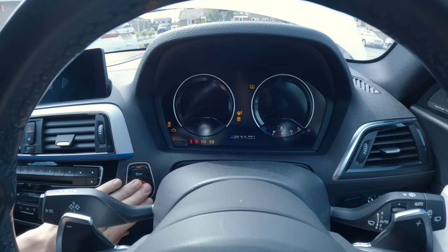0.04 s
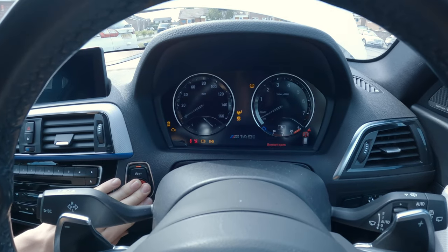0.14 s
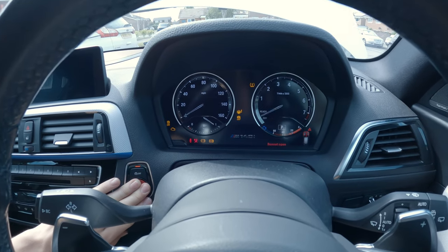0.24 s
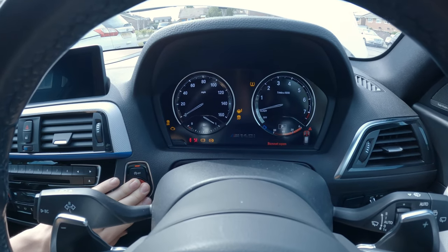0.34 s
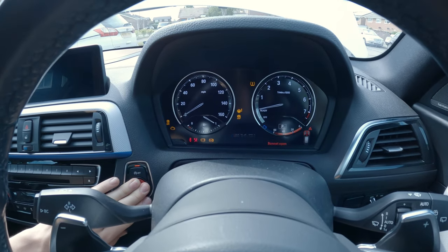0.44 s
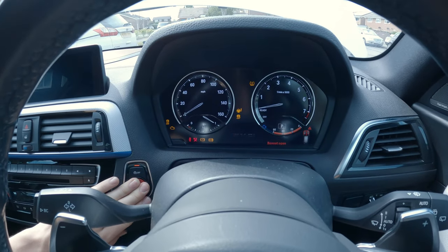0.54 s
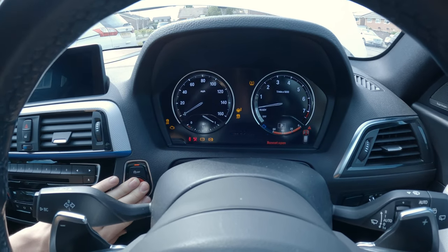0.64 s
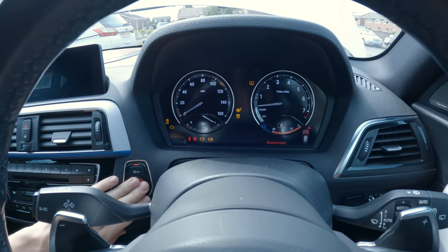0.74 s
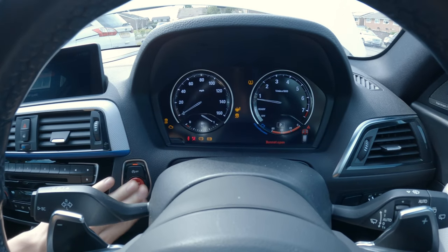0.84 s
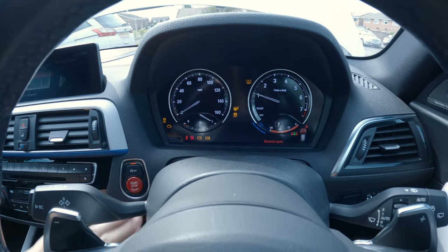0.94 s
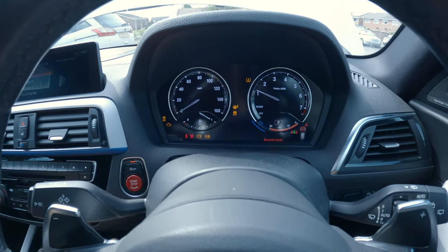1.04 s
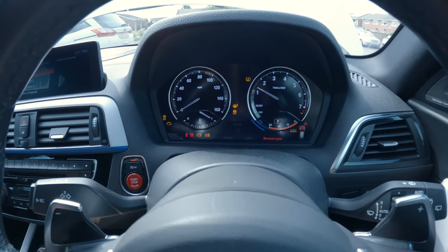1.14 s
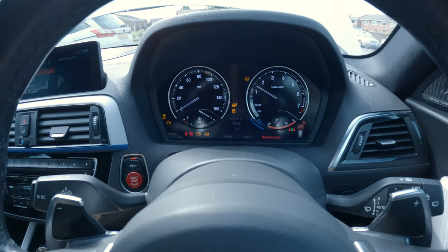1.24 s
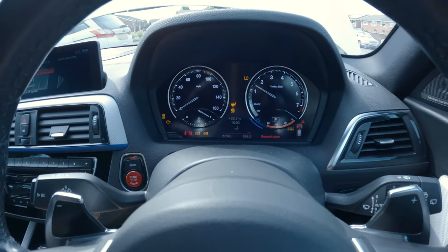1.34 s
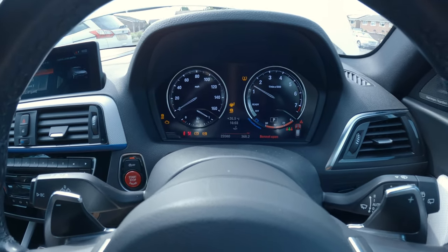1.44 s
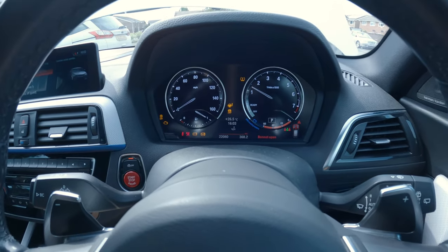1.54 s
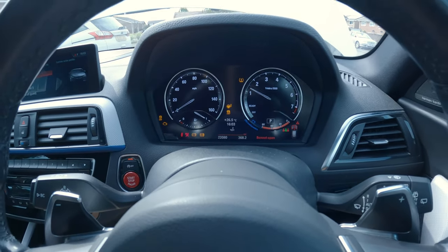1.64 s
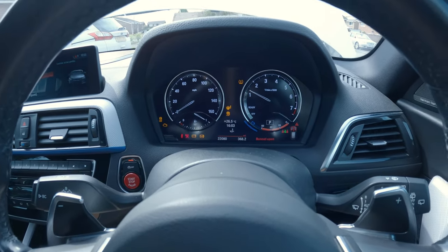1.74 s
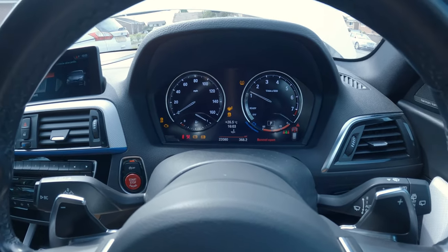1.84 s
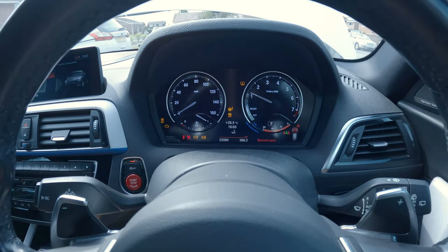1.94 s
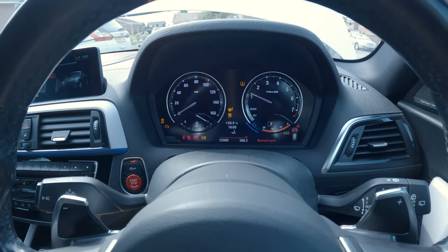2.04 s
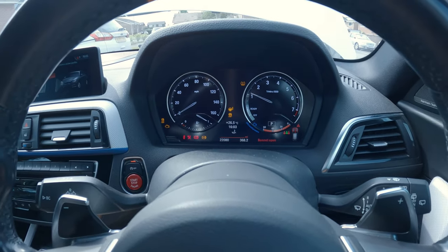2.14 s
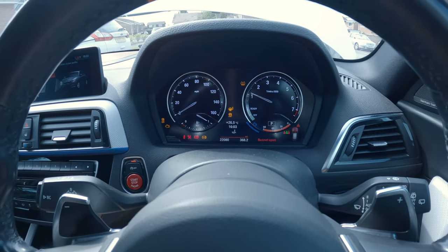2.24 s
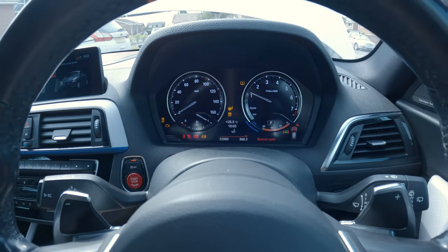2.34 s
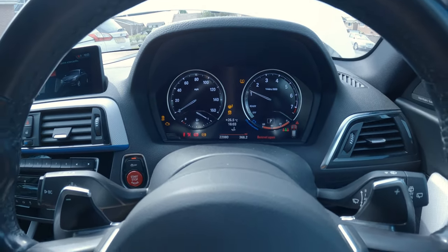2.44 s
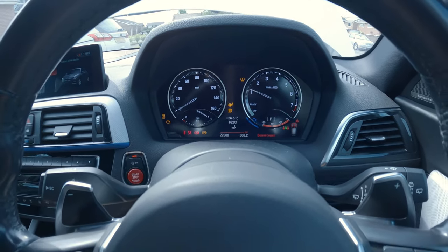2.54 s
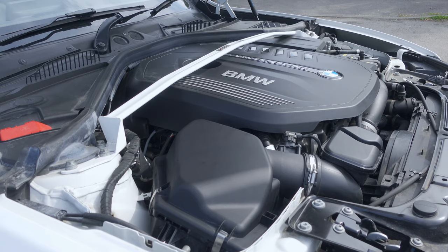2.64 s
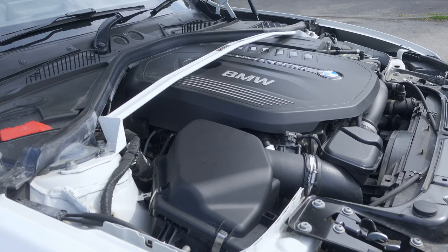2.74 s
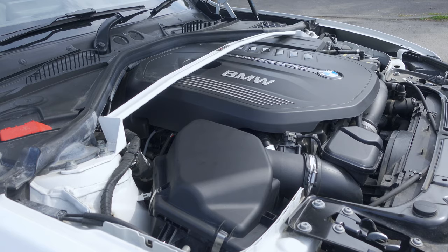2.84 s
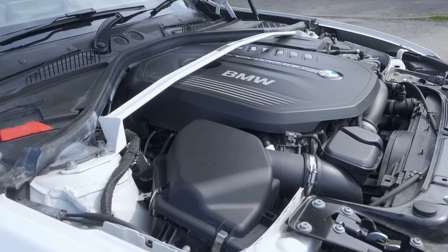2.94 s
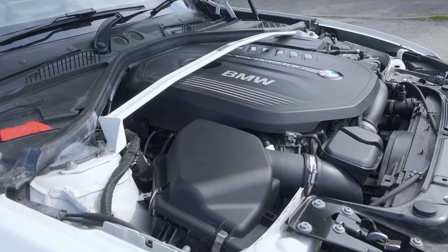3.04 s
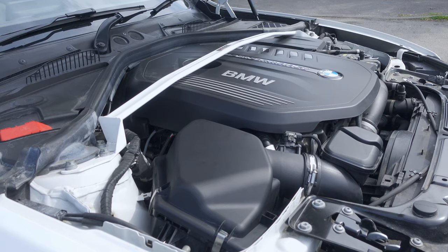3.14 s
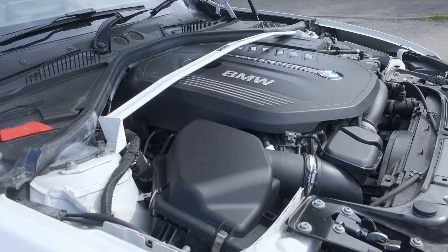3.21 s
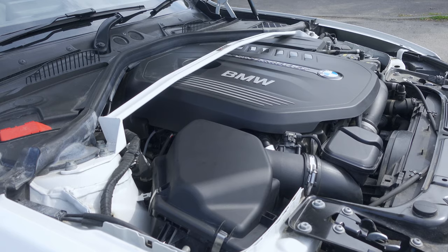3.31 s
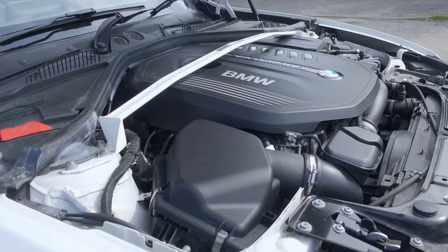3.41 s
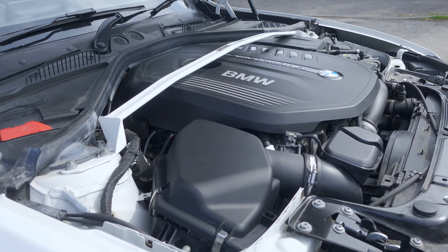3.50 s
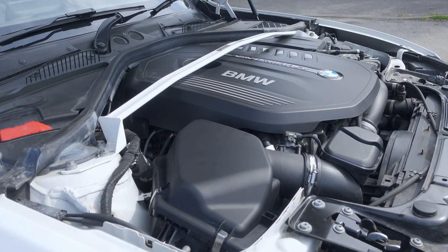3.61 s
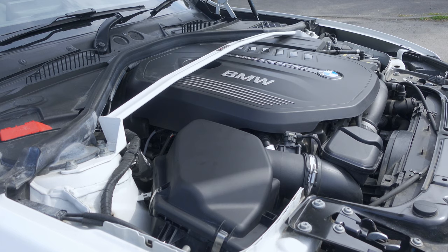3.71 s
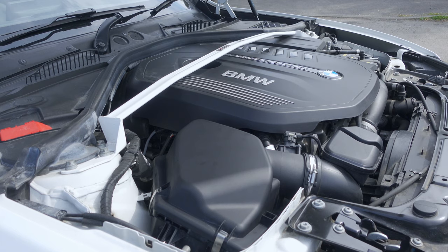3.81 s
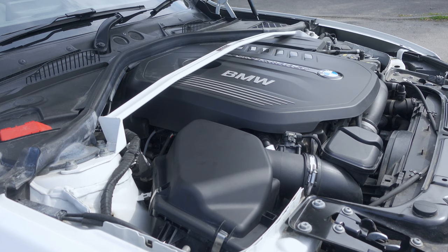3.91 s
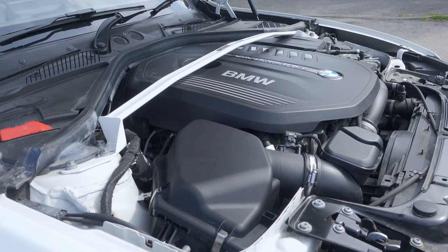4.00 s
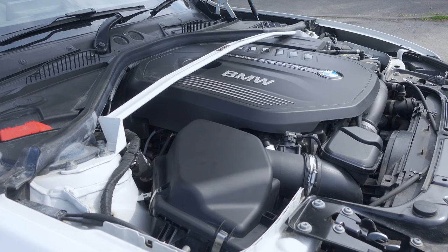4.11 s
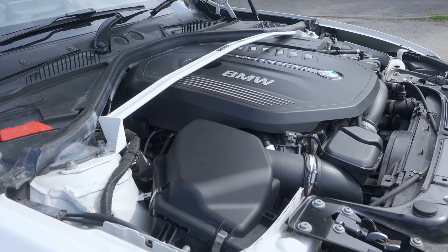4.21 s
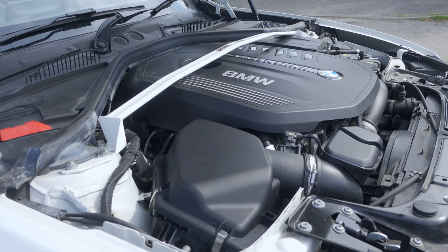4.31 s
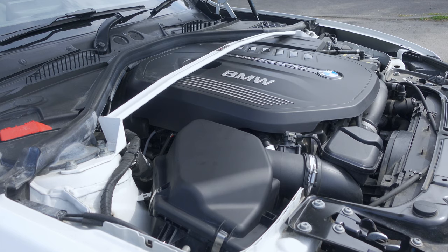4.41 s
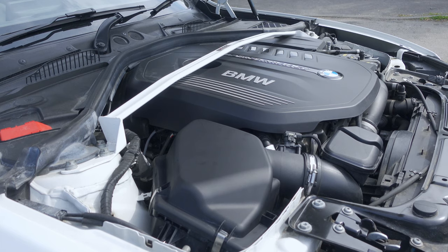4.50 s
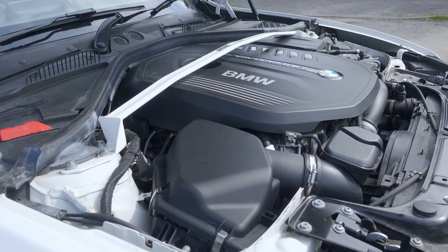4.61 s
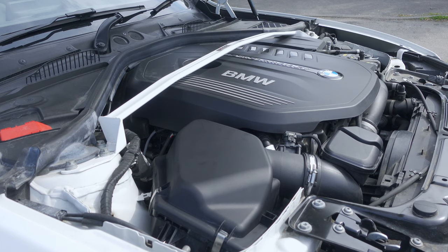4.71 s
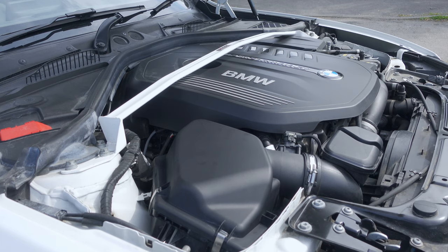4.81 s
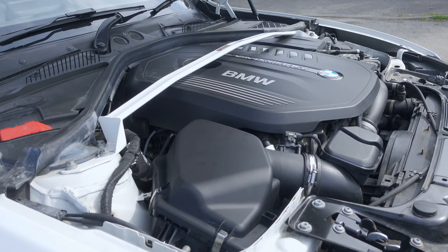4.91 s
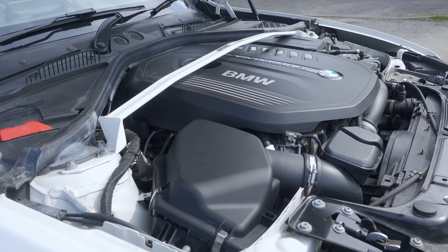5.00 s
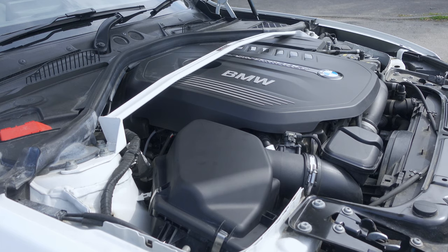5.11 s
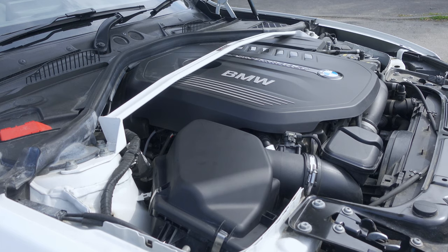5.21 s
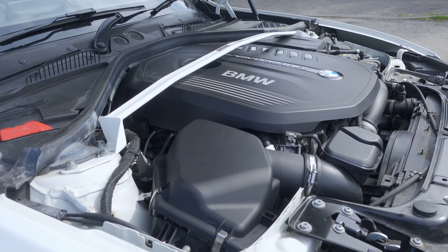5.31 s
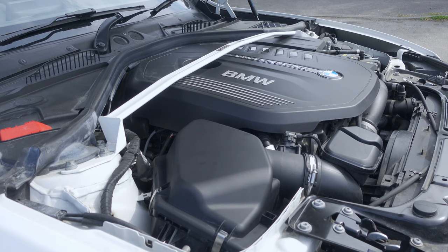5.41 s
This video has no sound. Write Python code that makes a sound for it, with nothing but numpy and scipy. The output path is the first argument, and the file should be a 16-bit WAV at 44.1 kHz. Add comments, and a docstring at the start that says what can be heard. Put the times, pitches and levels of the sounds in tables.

```python
"""Six-cylinder engine start, inside and out

One engine start is heard from the driver's seat, then, after a cut, again over the open bonnet. The starter
clacks in and grinds through four compressions; the engine catches, flares and sinks to a fast idle. Gear and
firing harmonics are sines gliding through resonances; contacts and air are coloured noise. Inside, the firing
orders boom; outside, valve gear, fuel pump and injectors clatter over them."""
import sys
import numpy as np
from scipy import signal
from scipy.fft import rfft, irfft
from scipy.io import wavfile
from scipy.ndimage import uniform_filter1d

SR = 44100
rng = np.random.default_rng(int(sys.argv[2]) if len(sys.argv) > 2 else 0)


def wav_out(sig):
    """Save sig, one row per channel (or a flat mono array), as 16-bit PCM at SR to the path in sys.argv[1]."""
    wavfile.write(sys.argv[1], SR, np.round(np.clip(np.atleast_2d(sig).T, -1, 1) * 32767).astype(np.int16))


N = 240417
T = np.arange(N) / SR

CUT_S, BAY_S = 2.643, 2.69  # the cabin ends; the engine bay begins
BAY_LAG_S = 2.562  # the start over the bonnet comes this much later
ENGAGE_S, RELEASE_S = .135, .75  # the starter meshes and drops out, on the cabin's clock
CAUGHT_BAY_S = 3.38  # the engine catches, over the bonnet
# No two cylinders are alike. One entry per cylinder in firing order: strength in dB.
FIRING_DB = [0, -1.5, 0, -1.5, 2.5, -0.2]
# The idle creeping up. Each row: time in seconds on the cabin's clock, firing rate in Hz.
IDLE = [(2.85, 59.25)]


def undb(db):
    """Decibels to gain."""
    return 10 ** (np.asarray(db) / 20)


def curve(rows, lag=0):
    """The values of a two-column table, joined by straight lines in time."""
    s, value = np.transpose(rows)
    return np.interp(T - lag, s, value)


def between(start, end):
    """A gate with 4 ms edges."""
    return np.clip(np.minimum(T - start, end - T) / .004, 0, 1)


def unit(x):
    """Scale to a standard deviation of 1."""
    return x / np.std(x)


def noise():
    """White noise."""
    return rng.standard_normal(N)


def wander(rate):
    """Smooth random drift of spread 1; a higher rate in Hz drifts faster."""
    k = int(SR / rate)
    return unit(uniform_filter1d(uniform_filter1d(noise(), k), k))


def response(points, hz):
    """Gain at the given pitches, in dB joined by straight lines over log frequency."""
    f, db = np.transpose(points)
    return undb(np.interp(np.log(np.maximum(hz, 1)), np.log(f), db))


def colour(x, points):
    """Causal minimum-phase filter with the given colour; white noise keeps its level."""
    size = 8192
    cepstrum = irfft(np.log(response(points, np.fft.rfftfreq(size, 1 / SR))))
    # fold the cepstrum onto positive time, so that nothing sounds early
    cepstrum[1:size // 2] *= 2
    cepstrum[size // 2 + 1:] = 0
    impulse = irfft(np.exp(rfft(cepstrum)))
    return signal.fftconvolve(x, impulse / np.linalg.norm(impulse))[:N]


def resonate(x, modes):
    """Drive parallel resonances, then scale to unit spread."""
    out = 0
    for hz, width, db in modes:
        b, a = signal.iirpeak(hz, hz / width, SR)
        out = out + undb(db) * signal.lfilter(b, a, x)
    return unit(out)


def struck(rows, points, attack_s, decay_s=None):
    """Bursts of contact noise in a heavily damped part of the given colour."""
    force = 0
    for s, db, *own_decay in rows:
        age = np.maximum(T - s, 0)
        decay = own_decay[0] if own_decay else decay_s
        force = force + undb(db) * (1 - np.exp(-age / attack_s)) * np.exp(-age / decay)
    return colour(force * noise(), points)


def rung(rows, modes):
    """Soft blows: each mode swells and dies away, never quite at the same pitch."""
    out = np.zeros(N)
    for s, db in rows:
        at = int(s * SR)
        age = T[:min(SR // 4, N - at)]
        for hz, mode_db, rise_s in modes:
            swell = (age / rise_s * np.exp(1 - age / rise_s)) ** 3
            turns = hz * (1 + .015 * rng.standard_normal()) * age + rng.random()
            out[at:at + len(age)] += undb(db + mode_db) * swell * np.sin(2 * np.pi * turns)
    return out


def taps(turns, pattern_db, scatter_db, ring_s):
    """One tap a turn, sized by a repeating pattern; each dies out along the same tangle of paths."""
    at = np.flatnonzero(np.diff(np.floor(turns)) > 0)
    x = np.zeros(N)
    x[at] = undb(np.resize(pattern_db, len(at)) + scatter_db * noise()[:len(at)])
    age = T[:SR // 20]
    tangle = rng.standard_normal(len(age)) * np.exp(-age / ring_s)
    return unit(signal.fftconvolve(x, tangle)[:N])


def order(turns, multiple, rough):
    """One harmonic of a shaft: a sine of rms 1 whose strength then trembles."""
    sine = np.sqrt(2) * np.sin(2 * np.pi * (multiple * turns + rng.random()))
    return sine * (1 + rough * wander(40))


def cabin_air():
    """Faint coloured noise for the cabin's air, with a hiss that fades out after the start."""
    # Room air. Each row: pitch in Hz, relative level in dB.
    room = [(59, -49.5), (100, -12), (368, 2), (1920, -10.5), (4500, -25.5), (7000, -35), (9300, -59.5),
            (11800, -29.5), (13500, -60)]
    # The early hiss. Each row: pitch in Hz, relative level in dB.
    hiss = [(900, -17), (3000, 1), (6500, -17.5), (8000, -22), (9500, -31)]
    early = np.clip((1.11 - T) / 0.28, 0, 1)
    return undb(-50) * colour(noise(), room) + undb(-57) * early * colour(noise(), hiss)


def bay_air():
    """Faint open air around the engine, as coloured noise."""
    # Outdoor air. Each row: pitch in Hz, relative level in dB.
    open_air = [(59, -53.5), (100, -6), (368, -4), (1920, -12.5), (14000, -27)]
    return undb(-50.0) * colour(noise(), open_air) * between(CUT_S, np.inf)


def whistle():
    """A thin, fluttering tone that comes up at idle and twice swells to a squeak."""
    # The squeaks. Each row: centre in seconds, level in dB.
    squeaks = [(4.95, -38), (5.262, -37)]
    steady = undb(-49 + 2.6 * wander(12)) * np.clip((T - 4.1) / 1.4, 0, 1)
    swells = sum(undb(db) * np.exp(-((T - s) / 0.01) ** 2) for s, db in squeaks)
    turns = np.cumsum(4208.5 * (1 + 0.008 * wander(220))) / SR  # Hz, fluttering
    return (steady + swells) * order(turns, 1, rough=0.5)


def brushes():
    """The starter motor's brushes whir on evenly through the strokes, as coloured noise."""
    # Brush whir. Each row: pitch in Hz, relative level in dB.
    whir = [(1500, -21), (4000, 5), (7200, -3.5), (10000, -14), (15500, -31)]
    return undb(-38.5) * colour(noise(), whir) * between(ENGAGE_S + BAY_LAG_S, RELEASE_S + BAY_LAG_S)


def starter_effort(t):
    """Gear mesh pitch, load 0-1 and accent in dB: a free spin-up, then one sagging stroke per compression."""
    # Compressions drag the starter down. Each row: start in seconds, length in seconds,
    # gear mesh pitch in Hz, whine accent in dB.
    compressions = [(0.293, 0.063, 382.2, 2.5), (0.419, 0.05, 308.5, -0.5), (0.512, 0.039, 310, -8),
                    (0.605, 0.044, 322, -7)]
    attack_s, release_s, drag_s = 0.015, 0.029, .052
    slack_hz = 246.4  # between compressions the gears run slack
    running = np.maximum(t - ENGAGE_S, 0)
    hz = 178.6 + 1300 * running  # Hz, and Hz per second of spin-up
    load = 0.78 * np.minimum(running / 0.034, 1) * (t < compressions[0][0] + attack_s)
    accent_db = 0
    for s, length, mesh_hz, db in compressions:
        age = t - s
        sagging = slack_hz + (mesh_hz - slack_hz) * np.exp(-(age / drag_s) ** 2)
        hz = np.where(age < 0, hz, sagging)
        stroke = np.clip(np.minimum(age / attack_s, 1 - (age - length) / release_s), 0, 1)
        load = np.maximum(load, stroke)
        accent_db = accent_db + db * stroke
    return hz, load, accent_db


def starter(lag, radiation, grind, whine_db, grind_db, rough, bite, play, count=9):
    """Gear harmonics glide through fixed resonances; the gritty grinding pulses with the teeth."""
    hz, load, accent_db = starter_effort(T - lag)
    whine_load = accent_db - 18.5 * (1 - load)  # dB
    grind_load = -10 * (1 - load)  # dB
    # play between the teeth makes the mesh uneven, which frays the higher harmonics
    teeth = np.cumsum(hz * (1 + play * wander(160))) / SR
    whine = sum(response(radiation, k * hz) * order(teeth, k, rough) for k in range(1, count))
    grit = noise() * undb(3 * wander(600))
    scrape = colour(unit(grit * (1 + bite * np.cos(2 * np.pi * teeth))), grind)
    engaged = between(ENGAGE_S + lag, RELEASE_S + lag)
    return (undb(whine_db + whine_load) * whine + undb(grind_db + grind_load) * scrape) * engaged


def cabin_starter():
    """The starter from the seat: gear whine over a muffled grind."""
    # How strongly gear harmonics sound. Each row: pitch in Hz, gain in dB.
    whine_gain = [(230, -9), (305, 6.5), (375, -11), (580, -26), (770, -6), (900, -15.5), (1100, -13),
                  (1250, -28), (2500, -33)]
    # The grind's colour. Each row: pitch in Hz, relative level in dB.
    grind = [(260, -29.5), (450, -15), (504, -2.5), (613, -9.5), (872, -3), (3820, -27), (9270, -59)]
    return starter(0, whine_gain, grind, whine_db=-25.5, grind_db=-36.5, rough=0.32, bite=0.51, play=0.012)


def bay_starter():
    """The pinion slams into the ring gear, whose decaying tones ring on while the starter grinds."""
    # How strongly gear harmonics sound. Each row: pitch in Hz, gain in dB.
    whine_gain = [(240, -15), (360, -4), (520, -6), (800, -5), (1120, 1.5), (1550, -9.5), (2800, -5.5)]
    # The grind's colour. Each row: pitch in Hz, relative level in dB.
    grind = [(100, -47), (170, -18.5), (369, -9), (518, -7), (614, -19), (1120, 0), (1670, -11.5),
             (2630, -8), (7420, -26), (15500, -65)]
    # Solenoid, pinion and gear backlash. Each row: start in seconds, level in dB, decay in seconds.
    clack_rows = [(2.694, -22.5, 0.019), (2.705, -17, 0.011), (2.723, -6, 0.0084), (2.984, -19.5, 0.022),
                  (3.082, -19, 0.026), (3.17, -15, 0.019)]
    # Their colour. Each row: pitch in Hz, relative level in dB.
    clack_colour = [(88, -56), (170, -14.5), (430, 2), (680, -10.5), (1110, -2.5), (1700, -9.5),
                    (2650, -7.5), (8830, -21), (15500, -47)]
    # Starter ring gear. Each row: pitch in Hz, relative level in dB, decay in seconds.
    gear_tones = [(1003, 5.5, 0.047), (1297, 2, 0.017), (1822, 3, 0.045), (2696, -1, 0.026),
                  (3170, 10.5, 0.013)]
    cranking = starter(BAY_LAG_S, whine_gain, grind, whine_db=-31.5, grind_db=-28.5,
                       rough=0.37, bite=0.56, play=0.014)
    clacks = struck(clack_rows, clack_colour, attack_s=0.0016)
    age = T[:SR // 2]
    ring = sum(undb(db) * np.sin(2 * np.pi * hz * age) * np.exp(-age / decay) for hz, db, decay in gear_tones)
    ringing = unit(signal.fftconvolve(clacks + 0.69 * cranking, ring)[:N])
    return cranking + brushes() + clacks + undb(-41.5) * ringing


def bay_rattles():
    """Metal parts rattle as the engine catches: short bursts of contact noise."""
    # The rattles. Each row: start in seconds, level in dB, decay in seconds.
    rattle_rows = [(3.215, -26, 0.021), (3.256, -22, 0.019), (3.287, -20, 0.015), (3.313, -18, 0.017),
                   (3.345, -25, 0.027), (3.37, -24, 0.025), (3.393, -20, 0.012), (3.523, -25.5, 0.02),
                   (3.569, -23, 0.0094)]
    # Their colour. Each row: pitch in Hz, relative level in dB.
    rattle_colour = [(410, -24), (700, -1), (1100, -4.5), (4000, -6.5), (4330, 0), (15700, -24)]
    return struck(rattle_rows, rattle_colour, attack_s=0.0015)


def cabin_knocks():
    """Thumps ring the body in soft low modes; gears, clicks and a relay are bursts of contact noise."""
    # Pinion going home and engine kicking on its mounts. Each row: start in seconds, level in dB.
    thump_rows = [(.131, -14), (.662, -21), (.69, -19), (.714, -14)]
    # The body's answer. Each row: pitch in Hz, relative level in dB, rise in seconds.
    thump_modes = [(163, -0.5, 0.016), (315.6, -1, 0.026), (521, -17, 0.028)]
    # Starter gears knock as a compression takes up their slack.
    # Each row: start in seconds, level in dB, decay in seconds.
    chug_rows = [(.42, -28.5, .02), (.519, -28.5, 0.03), (.607, -24, 0.022)]
    # Their colour. Each row: pitch in Hz, relative level in dB.
    chug_colour = [(600, -28), (880, 3), (1030, -3), (1250, -16), (3000, -31.5), (8000, -61)]
    # Cabin clicks. Each row: start in seconds, level in dB, decay in seconds.
    click_rows = [(.139, -36.5, 0.022), (.157, -32, 0.028), (.451, -38, .008), (.854, -19, 0.012),
                  (.881, -32, 0.0096), (1.301, -44, 0.014)]
    # Their colour. Each row: pitch in Hz, relative level in dB.
    click_colour = [(350, -39), (600, -5.5), (1810, -3), (2570, -11), (6340, -25), (11900, -44.5),
                    (15000, -56)]
    # A relay just before the starter engages. Each row: start in seconds, level in dB, decay in seconds.
    relay_rows = [(.112, -47, 0.014)]
    # Its colour. Each row: pitch in Hz, relative level in dB.
    relay_colour = [(1000, -22), (5200, -15), (5500, 2), (5800, -16), (7000, -17), (9300, -35),
                    (11500, -13), (14000, -35)]
    knocks = rung(thump_rows, thump_modes)
    knocks += struck(chug_rows, chug_colour, attack_s=0.0015)
    knocks += struck(click_rows, click_colour, attack_s=0.00099)
    return knocks + struck(relay_rows, relay_colour, attack_s=0.0029)


def crankshaft(lag, unsteady):
    """Firing rate, and firings counted since the start; the speed is never quite even."""
    # First firings. Each row: time in seconds, firing rate in Hz.
    catch = [(.67, 36), (.77, 48.92), (.83, 51.16)]
    # Flare and sag. Each row: time in seconds, firing rate in Hz.
    flare = [(0.92, 61.6), (1.002, 67.23), (1.118, 70.6), (1.218, 72.3), (1.504, 67.92), (1.98, 61),
             (2.064, 59.2), (2.38, 57.94), (2.5, 57.8)]
    hz = curve(list(catch) + list(flare) + list(IDLE), lag)
    return hz, np.cumsum(hz * (1 + unsteady * wander(25))) / SR


def puffs(firings, length, between_db):
    """Noise that surges with each firing, by cylinder; unit spread."""
    strength = undb(FIRING_DB)[firings.astype(int) % len(FIRING_DB)]
    return unit(noise() * (strength * np.exp(-(firings % 1) / length) + undb(between_db)))


def valve_gear(firings, scatter_db, ring_s, count=18):
    """Cams, valves and chain each knock at their own angle, once in six firings."""
    cycles = firings / len(FIRING_DB)
    return unit(sum(taps(cycles + (k + rng.random()) / count, [0], scatter_db, ring_s) for k in range(count)))


def low_order(firings, hz, k, humps, rough):
    """A low order swells and fades as the revs carry it through the resonances."""
    gain = sum(undb(db) * np.exp(-((k * hz - centre) / width) ** 2) for centre, width, db in humps)
    return gain * order(firings, k, rough)


def upper_orders(firings, hz, boom, multiples, rough):
    """The higher orders swell as they glide through the resonances."""
    return sum(response(boom, k * hz) * order(firings, k, rough) for k in multiples)


def cabin_shake(firings):
    """The body shakes on the engine mounts: noise puffs at each firing, coloured by the body."""
    # Shaking. Each row: time in seconds, level in dB.
    shake_level = [(.12, -45.5), (.15, -18), (.25, -33.5), (.68, -24.5), (.74, -16.5), (.85, -18),
                   (1.0, -29.5), (1.3, -30.5), (2.64, -27)]
    # The body's colour. Each row: pitch in Hz, relative level in dB.
    body = [(25, -42), (52, -4), (90, -10), (150, 1), (310, -5), (420, -7), (650, -40), (1000, -73.5)]
    return undb(curve(shake_level)) * colour(puffs(firings, length=0.46, between_db=-11.5), body)


def cabin_valve_gear(firings):
    """Valve gear taps and some noise, heard through the bulkhead."""
    # Bulkhead leakage. Each row: time in seconds, level in dB.
    leak_level = [(.62, -65), (.7, -37), (.82, -39), (.97, -51), (1.3, -56.5), (2.64, -51.5)]
    # Its colour. Each row: pitch in Hz, relative level in dB.
    leak_colour = [(350, -48), (600, -10), (737, -7.5), (849, -13.5), (1140, -11), (1270, -19),
                   (7010, -40.5), (9300, -81), (11700, -44), (13000, -75.5)]
    gear = unit(valve_gear(firings, scatter_db=-2.5, ring_s=0.021) + 0.25 * noise())
    return undb(curve(leak_level)) * colour(gear, leak_colour)


def cabin_covers():
    """Of the ringing engine covers only the lowest tones get through: noise in narrow resonances."""
    # Cover hum. Each row: time in seconds, level in dB.
    hum_level = [(1.0, -70.5), (1.3, -44.5), (2.64, -41)]
    # Cover tones at the seat. Each row: pitch in Hz, width in Hz, relative level in dB.
    cover_modes = [(582, 57, 2), (839, 89, 3.5), (870, 40, -3.5), (947, 27, -5), (1085, 65, -1.5)]
    return undb(curve(hum_level)) * resonate(resonate(noise(), cover_modes), cover_modes)


def shudder(firings, push, uneven_db):
    """Each early firing shoves the body, some harder than others, and rings cabin air and panels."""
    # The first hard firings rock the car. Each row: time in seconds, level in dB.
    shudder_level = [(.68, -44), (.705, -17.5), (.765, -13), (.80, -9), (.825, -16.5), (.94, -21),
                     (1.0, -64)]
    # Cabin air and panels. Each row: pitch in Hz, width in Hz, relative level in dB.
    panels = [(52, 7, -9.5), (78.7, 22, -9.5), (148.5, 33, -3), (292, 120, -11), (390, 39, -1)]
    shove = np.exp(-((firings % 1 - .5) / push) ** 2) * undb(uneven_db * wander(72))
    thud = signal.sosfilt(signal.butter(6, 420, fs=SR, output="sos"), resonate(shove, panels))
    thud = signal.sosfilt(signal.butter(2, 32, "highpass", fs=SR, output="sos"), thud)
    return undb(curve(shudder_level)) * thud * between(shudder_level[0][0], shudder_level[-1][0])


def cabin_boom(firings, hz):
    """Firing orders boom through cabin resonances; the third barks while the engine pulls up to speed."""
    # Resonances of the low orders. Each row: pitch in Hz, half-width in Hz, level in dB.
    humps = [(56.6, 2.2, -27.5), (66.2, 6, -29), (126.2, 6.43, -18.5), (139, 9.5, -14.5), (179.5, 17, -26),
             (219, 9.3, -33.5)]
    # How strongly upper orders sound. Each row: pitch in Hz, gain in dB.
    upper_gain = [(235, -14), (246, -4), (288, -1), (297, -12.5), (310, -2), (325, -23.5), (360, -18.5),
                  (398, -4.5), (428, -12), (495, -15.5), (560, -35)]
    first, second, third = (low_order(firings, hz, k, humps, rough=0.079) for k in (1, 2, 3))
    pull = np.clip((1.08 - T) / .14, 0, 1)
    boom = first + second + undb(14 * pull) * third
    boom += undb(-25.0) * upper_orders(firings, hz, upper_gain, range(4, 10), rough=0.24)
    caught = np.clip((T - .84) / 0.12, 0, 1)
    return caught * boom


def cabin():
    """From the seat: a shudder as it catches, then booming orders over muffled mechanics."""
    hz, firings = crankshaft(0, unsteady=0.0018)
    mechanics = cabin_shake(firings) + cabin_valve_gear(firings) + cabin_covers()
    engine = cabin_boom(firings, hz) + shudder(firings, push=0.074, uneven_db=2.5) + mechanics
    return engine + cabin_starter() + cabin_knocks()


def fuel_system(firings, running):
    """Pump strokes and injector clicks ring small metal parts and grow louder after the first firing."""
    # Pump body. Each row: pitch in Hz, width in Hz, relative level in dB.
    pump_modes = [(4410, 70, -1), (5230, 359, 0.18)]
    # Injector bodies. Each row: pitch in Hz, width in Hz, relative level in dB.
    injector_modes = [(7060, 390, 2), (8180, 330, 2), (8720, 560, 7), (9500, 270, 0.5), (10300, 1100, 1.9)]
    # Uneven injectors. One entry per cylinder in firing order: strength in dB.
    needle_db = [1.5, 0.5, -0.5, 3.5, 0, 7.5]
    # the fuel pump makes one stroke for every two firings
    strokes = taps(firings / 2, [0], scatter_db=1.5, ring_s=0.003) + 0.6 * noise()
    pump = resonate(resonate(strokes, pump_modes), pump_modes)
    # each injector needle clicks as it opens and again as it shuts
    needles = sum(taps(firings + offset, needle_db, scatter_db=3.5, ring_s=0.01) for offset in (0, .5))
    injectors = resonate(resonate(needles + 0.93 * noise(), injector_modes), injector_modes)
    fuel_db = -34 - 16 * np.exp(-running / 0.43)
    return undb(fuel_db) * (undb(-4.5) * injectors + undb(-7.5) * pump)


def fuel_ticks():
    """Sharp ticks of the fuel system that stand out at idle: very short bursts of contact noise."""
    # The ticks. Each row: start in seconds, level in dB.
    tick_rows = [(4.151, -27), (4.242, -26), (4.529, -24.5), (4.631, -30), (4.732, -30.5), (4.836, -27),
                 (5.043, -24), (5.147, -25), (5.184, -27), (5.252, -25), (5.301, -25), (5.356, -26.5),
                 (5.401, -26.5)]
    # Their colour. Each row: pitch in Hz, relative level in dB.
    tick_colour = [(2000, -27), (6600, -11), (7000, -1), (7400, -5), (8000, 2), (8800, -8), (9800, -9),
                   (10800, -12), (15000, -20)]
    return struck(tick_rows, tick_colour, attack_s=0.00095, decay_s=0.0074)


def intake_throb(firings):
    """Each intake stroke rings the air box, most as the throttle catches the falling revs."""
    # Intake throb. Each row: time in seconds, level in dB.
    throb_level = [(3.8, -45), (4.28, -32.5), (4.5, -33), (4.7, -40)]
    # Uneven strokes. One entry per cylinder in firing order: strength in dB.
    stroke_db = [1.5, -4, -1, 6, -3, 3.5]
    # Air box. Each row: pitch in Hz, width in Hz, relative level in dB.
    box_modes = [(303, 76, 7.5), (492, 33, -6.5)]
    strokes = taps(firings, stroke_db, scatter_db=0.5, ring_s=0.0028)
    return undb(curve(throb_level)) * resonate(strokes, box_modes)


def block_rocking():
    """The first firings rock the block on its mounts: a swell of low resonant noise."""
    # Rocking block. Each row: pitch in Hz, width in Hz, relative level in dB.
    rock_modes = [(127.7, 93, 0)]
    swell = undb(-33.5) * np.exp(-((T - CAUGHT_BAY_S) / 0.086) ** 2)
    return swell * resonate(resonate(noise(), rock_modes), rock_modes)


def block_rumble(firings):
    """Valve gear taps and combustion puffs, coloured by the heavy block."""
    # The block's colour. Each row: pitch in Hz, relative level in dB.
    block_colour = [(60, -42), (110, -2), (300, 8), (540, 7), (680, -12), (1500, -25.5)]
    gear = valve_gear(firings, scatter_db=2.0, ring_s=0.011)
    combustion = 1.16 * puffs(firings, length=0.3, between_db=-15)
    return undb(-33.5) * colour(unit(gear + combustion), block_colour)


def bay_walls(x, echo_db, count=10):
    """Bonnet and wings send back a handful of early echoes, which give the clatter a hollow ring."""
    lags = (rng.uniform(.001, .009, count) * SR).astype(int)
    return unit(x + undb(echo_db) * sum(rng.choice([-1, 1]) * np.pad(x, (lag, 0))[:N] for lag in lags))


def valve_clatter(firings, hz):
    """Valve gear taps echo round the bay, louder as the revs rise above idle."""
    # The clatter's colour. Each row: pitch in Hz, relative level in dB.
    valve_colour = [(350, -32), (600, -12.5), (736, -13), (844, -5), (1420, -9.5), (2620, -10), (3260, -18),
                    (4350, -15), (7410, -24), (8490, -23), (15700, -44.5)]
    level_db = -31 + 0.13 * np.maximum(hz - IDLE[0][1], 0)  # dB per Hz of firing rate
    gear = valve_gear(firings, scatter_db=1.45, ring_s=0.0054) + 0.55 * noise()
    return undb(level_db) * colour(bay_walls(gear, echo_db=-18.5), valve_colour)


def cover_knock(firings):
    """Each combustion knocks on the engine covers, which ring."""
    # Engine covers. Each row: pitch in Hz, width in Hz, relative level in dB.
    cover_modes = [(824, 31, 7), (898, 88, 1.5), (1046, 34, 6.5), (1880, 74, 4), (2015, 48, 2.5),
                   (2586, 55, -2)]
    blows = taps(firings, FIRING_DB, scatter_db=1.5, ring_s=0.004)
    blows = blows + 0.8 * puffs(firings, length=0.2, between_db=-11)
    return undb(-36) * resonate(blows, cover_modes)


def firing_knocks():
    """Hollow knocks of harder firings: soft blows in a few modes."""
    # The knocks. Each row: start in seconds, level in dB.
    knock_rows = [(4.276, -21), (4.291, -26), (4.322, -25), (4.387, -23), (4.434, -24), (4.465, -25),
                  (4.482, -19), (4.498, -25), (4.514, -20), (4.58, -22), (4.785, -23.5), (4.835, -22),
                  (4.925, -20), (5.237, -18), (5.337, -17.5), (5.424, -19.5)]
    # Their ring. Each row: pitch in Hz, relative level in dB, rise in seconds.
    knock_modes = [(880, -2, 0.0043), (520, -1, 0.0042), (1056, -17, 0.003)]
    return rung(knock_rows, knock_modes)


def bay_drone(firings, hz, count=5):
    """The low orders come in as the engine catches, the upper ones just after."""
    # Resonances of the low orders. Each row: pitch in Hz, half-width in Hz, level in dB.
    humps = [(72.02, 5.54, -52), (118.34, 9.5, -32), (134.8, 9.2, -29), (170.7, 8.9, -38.5),
             (195.16, 7, -29), (210.7, 6.8, -27.5), (256, 13.5, -32), (283.7, 14.6, -26.5)]
    # How strongly upper orders sound. Each row: pitch in Hz, gain in dB.
    upper_gain = [(345, -5.5), (385, -7), (420, -2.5), (460, -9.5), (500, -5), (560, -1.5), (620, -28)]
    low = sum(low_order(firings, hz, k, humps, rough=0.046) for k in range(1, count + 1))
    upper = undb(-34.0) * upper_orders(firings, hz, upper_gain, range(6, 10), rough=0.24)
    return np.clip((T - 3.36) / 0.017, 0, 1) * low + np.clip((T - 3.4) / 0.14, 0, 1) * upper


def bay_engine():
    """Over the engine: firing orders, block rumble, valve clatter, pump and injector ticks."""
    hz, firings = crankshaft(BAY_LAG_S, unsteady=.002)
    # a firing falls at 4.498 s, so that the knocks keep step with the engine
    firings = firings + 1 - np.interp(4.498, T, firings) % 1
    running = np.maximum(T - 3.22, 0)  # seconds since the first firing
    # the mechanics set in with the first firing and surge once as the engine catches
    surge_db = 3.5 * np.exp(-((T - CAUGHT_BAY_S) / 0.065) ** 2)
    surge = np.minimum(running / 0.044, 1) * undb(surge_db)
    mechanics = block_rumble(firings) + valve_clatter(firings, hz) + cover_knock(firings)
    mechanics = mechanics + intake_throb(firings) + block_rocking() + fuel_system(firings, running)
    return bay_drone(firings, hz) + surge * mechanics + whistle() + firing_knocks() + fuel_ticks()


def scene():
    """The two viewpoints one after the other, each over its own faint background air."""
    inside = (cabin_air() + cabin()) * between(-1, CUT_S)
    # the deepest bass is cut away outside
    bass_cut = signal.butter(3, 79, "highpass", fs=SR, output="sos")
    bay = signal.sosfilt(bass_cut, bay_starter() + bay_rattles() + bay_engine())
    return (inside + bay_air() + bay * between(BAY_S, np.inf))[None]


def record(dry):
    """The recorder rounds the loudest peaks and cuts the top above 15750 Hz."""
    rounded = np.tanh(.9 * dry) / .9
    return signal.sosfilt(signal.ellip(10, .2, 80, 15750, fs=SR, output="sos"), rounded)


dry = scene()
out = record(dry)
wav_out(out)
```